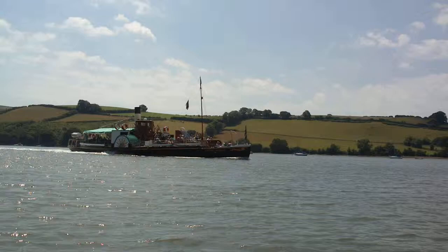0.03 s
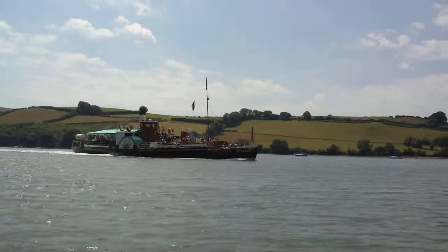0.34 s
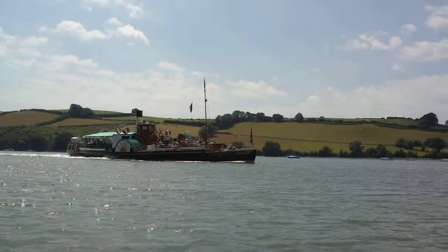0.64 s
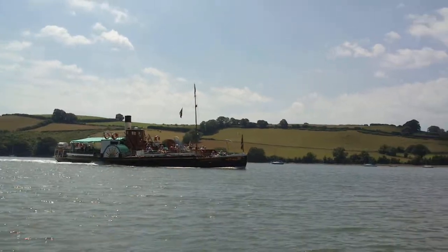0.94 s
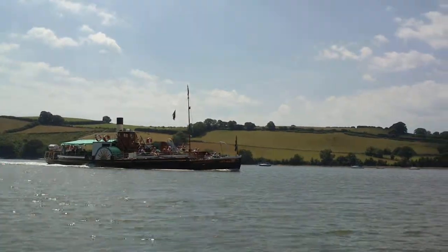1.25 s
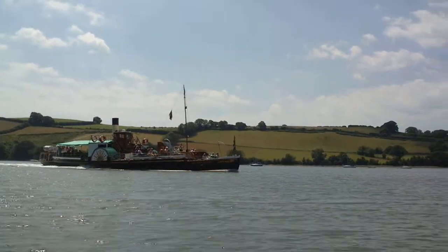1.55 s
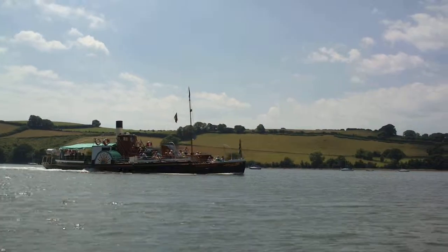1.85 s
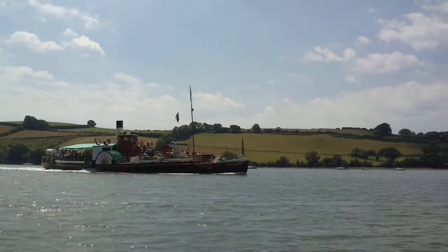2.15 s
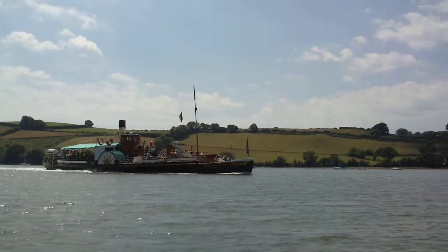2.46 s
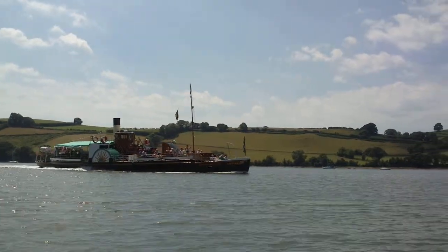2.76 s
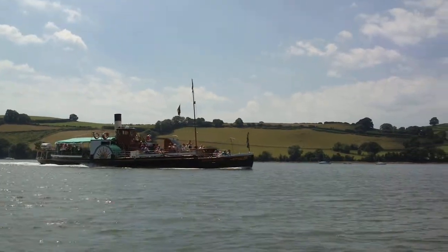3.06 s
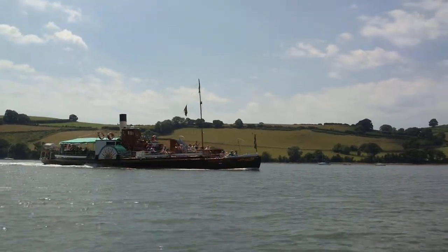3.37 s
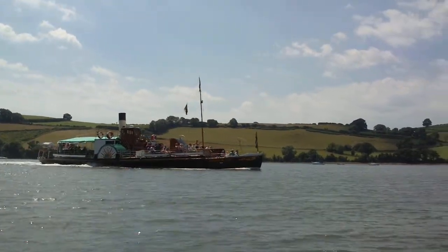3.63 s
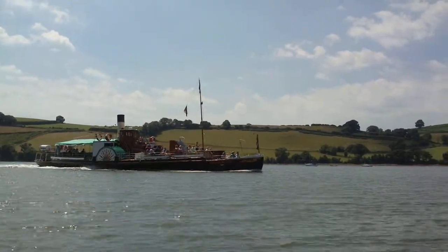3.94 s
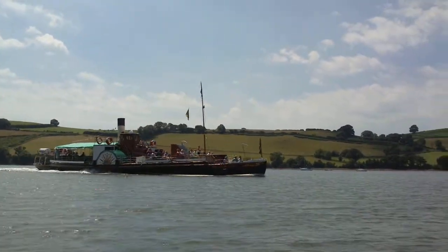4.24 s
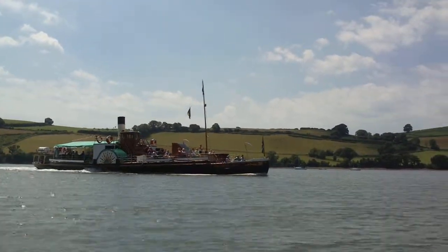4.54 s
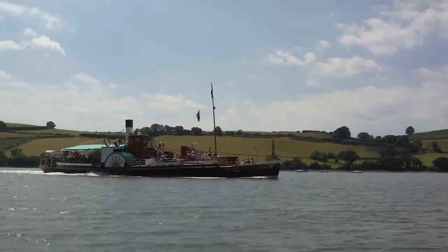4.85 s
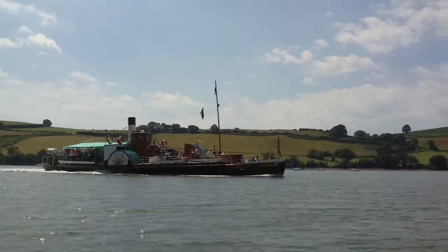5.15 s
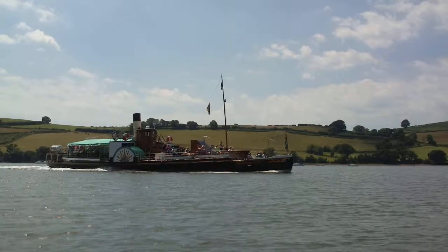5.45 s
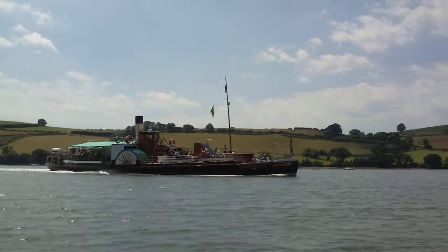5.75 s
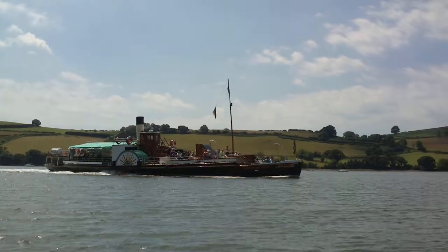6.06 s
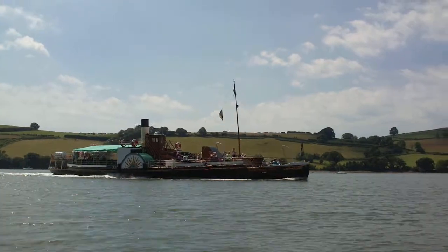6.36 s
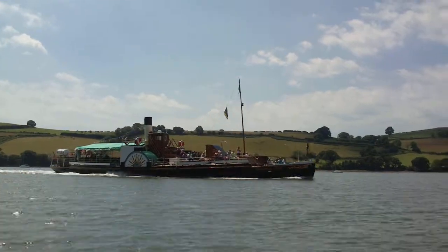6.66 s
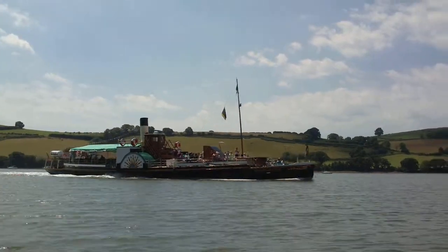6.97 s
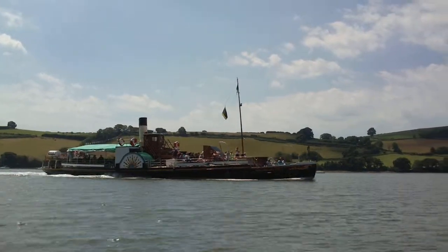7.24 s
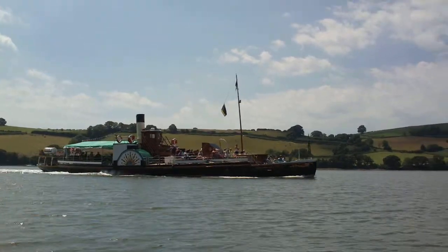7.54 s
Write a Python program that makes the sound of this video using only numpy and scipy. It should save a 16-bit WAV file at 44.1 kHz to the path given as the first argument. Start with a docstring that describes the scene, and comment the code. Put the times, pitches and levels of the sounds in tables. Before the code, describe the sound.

A distant paddle steamer slaps the water in a quick, even beat over a hissing wake, while wind rumbles on the microphone.

```python
"""A paddle steamer passes far out on a river, heard through a small camera microphone in a breeze.
At 0.4 s the sound starts: the wake churns and fizzes, wind rumbles on the microphone port.
From 0.5 s the paddle floats slap the water about seven times a second, each throwing spray.
Small ticks sound close by at 0.9, 1.8 and 4.6 s; at 3.6 s the sound cuts out for an instant.
The splashing brightens as the boat nears; waves throw extra spray, most of it around 6.4 s."""
import sys
import numpy as np
from scipy import signal
from scipy.fft import rfft, irfft
from scipy.io import wavfile
from scipy.ndimage import uniform_filter1d

SR = 44100
rng = np.random.default_rng(int(sys.argv[2]) if len(sys.argv) > 2 else 0)


def transcribe(u):
    """Save the signal u as a 16-bit wav file named by the first command-line argument.

    u: samples, shape (n,) or (channels, n), limited to [-1, 1]; the rate is SR.
    q: integer samples, one column per channel.
    """
    v = np.clip(np.atleast_2d(u).T, -1, 1)
    q = np.round(v * 32767).astype(np.int16)
    wavfile.write(sys.argv[1], SR, q)


N = 339570
TIME = np.arange(N) / SR
CUTOFF_HZ = 15500


# Bite of the floats as the hull rides the river: time_s, level_db
SLAP_LEVELS = [(.55, -54.5), (.95, -50), (1.9, -51), (3.3, -48.5), (3.8, -52.5), (4.25, -48.5),
               (5.6, -48.5), (6.95, -48.5), (7.6, -48.5)]
# Collapsing air pockets: frequency_hz, relative_db
SLAP_SPECTRUM = [(150, -4), (280, 1.5), (580, -2), (850, -6.5), (1350, -10), (2150, -10.5), (2700, -19.5),
                 (4400, -30), (8000, -41), (15000, -65)]
# Spray and foam: frequency_hz, relative_db
SPRAY_SPECTRUM = [(1500, -2.5), (3500, -12.5), (5500, 3), (7000, 5.5), (8200, -9), (11000, -19),
                  (15000, -59)]
def paddles(spray_db=-68.5, spray_rise_db_per_s=.2, wave_share=1.37,
            slap_scatter_db=1.5, spray_scatter_db=1.3, lumps_db=1.28):
    """Each float smacks collapsing air pockets into the water and flings up finer spray."""
    entry_s = float_times()
    slap_luck, spray_luck = rng.standard_normal((len(entry_s), 2)).T
    smack_db = np.interp(entry_s, *np.transpose(SLAP_LEVELS)) + slap_scatter_db * slap_luck
    shower_db = spray_db + spray_rise_db_per_s * entry_s + spray_scatter_db * spray_luck
    smack = swells(entry_s, smack_db, rise_s=0.014, fall_s=0.04, hold_s=0.023)
    shower = swells(entry_s, shower_db, rise_s=0.032, fall_s=0.033)
    pockets = coloured(drops(per_s=5000, spread_db=2.5), SLAP_SPECTRUM)
    spray = coloured(drops(per_s=9000, spread_db=-1.0), SPRAY_SPECTRUM)
    spray *= from_db(wave_share * wave_lift_db())
    lumps = from_db(lumps_db * drift(rate_hz=59))   # water breaks unevenly along the float
    return (smack * pockets + shower * spray) * lumps


def float_times(first_s=.536, period_s=.14707, floats_per_turn=12,
                labour_s=.010, most_delayed_at_s=0.69, chop_s=0.0028):
    """Floats enter evenly, but for the wheel's labouring once a turn and the river's chop."""
    even_s = np.arange(first_s, TIME[-1], period_s)
    turns = (even_s - most_delayed_at_s) / (floats_per_turn * period_s)
    return even_s + labour_s * np.cos(2 * np.pi * turns) + chop_s * rng.standard_normal(len(even_s))


# Waves at the wheel: centre_s, base_lift_db, half_length_s
WHEEL_WAVES = [(1.033, 0.5, 0.15), (4.68, 2.5, 0.17), (6.448, 5, .25), (7.313, 3, .25)]
def wave_lift_db():
    """The wheel digs into a wave and throws more water; each layer scales this lift by its share."""
    return sum(lift_db * hump(centre_s, half_s) for centre_s, lift_db, half_s in WHEEL_WAVES)


# Tumbling white water: frequency_hz, relative_db
CHURN_SPECTRUM = [(100, 5.5), (280, 2.5), (600, -0.5), (850, -4), (1350, -8), (2150, -6.5), (2700, -16),
                  (3600, -21), (6000, -26.5), (15000, -46.5)]
def wake(churn_start_db=-50.5, churn_rise_db_per_s=0.156, churn_wave_share=0.12,
         fizz_start_db=-69, fizz_rise_db_per_s=0.29, fizz_wave_share=.7):
    """White water tumbles behind the wheels and foam fizzes; both grow with nearness and waves."""
    lift_db = wave_lift_db()
    churn_db = churn_start_db + churn_rise_db_per_s * TIME + churn_wave_share * lift_db
    fizz_db = fizz_start_db + fizz_rise_db_per_s * TIME + fizz_wave_share * lift_db
    churn = from_db(churn_db) * coloured(drops(per_s=9000, spread_db=2.5), CHURN_SPECTRUM)
    fizz = from_db(fizz_db) * coloured(drops(per_s=20000, spread_db=-3.0), SPRAY_SPECTRUM)
    return churn + fizz


def approaching(x, first_db=-2.0, last_db=3.5, centre_hz=3200, width_hz=1400):
    """The splashing gains presence as the boat nears."""
    presence = signal.lfilter(*signal.iirpeak(centre_hz, centre_hz / width_hz, fs=SR), x)
    gain = from_db(np.linspace(first_db, last_db, N))
    return x + presence * (gain - 1)


def reflected(x, first_lag_s=0.00196, last_lag_s=0.00184, echo_db=-19.0, lowpass_hz=4500):
    """A nearby surface adds a faint short echo; its comb slides upward as the boat moves on."""
    lag_s = np.linspace(first_lag_s, last_lag_s, N)
    delayed = np.interp(TIME - lag_s, TIME, x)
    pole = np.exp(-2 * np.pi * lowpass_hz / SR)
    echo = signal.lfilter([1 - pole], [1, -pole], delayed)
    return x + from_db(echo_db) * echo


# Steady breeze: time_s, level_db
BREEZE_LEVELS = [(.45, -46), (1.8, -43.5), (2.4, -38), (3.15, -46), (4.45, -35.5), (4.9, -35),
                 (5.12, -39.5), (5.95, -43.5), (6.55, -37.5), (6.9, -39), (7.7, -43)]
# Gusts on top: centre_s, level_db, half_length_s
WIND_GUSTS = [(1.0, -38, 0.095), (1.125, -38, 0.035), (1.55, -35.5, 0.061), (2.106, -35, 0.038),
              (2.285, -38, 0.063), (2.709, -34.5, 0.028), (2.815, -31.5, 0.013), (2.986, -37.5, 0.056),
              (3.365, -38.5, 0.063), (3.607, -35, 0.02), (3.822, -35, 0.026), (4.96, -34.5, .04),
              (5.464, -36, 0.079), (5.696, -33, 0.027), (6.254, -37, 0.058)]
# Turbulence at the port: frequency_hz, relative_db
RUMBLE_SPECTRUM = [(10, -11.5), (22, -1.5), (38, 1), (65, -4.5), (100, -13.5), (160, -18.5), (240, -31.5),
                   (400, -47), (1500, -75)]
# Single eddies: centre_s, peak_db, pitch_hz
PORT_EDDIES = [(2.208, -34, 119), (3.4029, -28.5, 107), (3.82, -29, 45), (4.83, -34, 110), (4.959, -26, 54)]
def wind(flutter_db=2.3, evenness=0.9):
    """Breeze and gusts rumble on the microphone port; each eddy gives one swing of pressure."""
    breeze_db = np.interp(TIME, *np.transpose(BREEZE_LEVELS)) + flutter_db * drift(rate_hz=6)
    gust_power = sum(from_db(db) ** 2 * hump(centre_s, half_s) for centre_s, db, half_s in WIND_GUSTS)
    envelope = np.sqrt(from_db(breeze_db) ** 2 + gust_power)
    rumble = coloured(rng.standard_normal(N), RUMBLE_SPECTRUM)
    running_rms = np.sqrt(uniform_filter1d(rumble ** 2, size=4000))
    out = envelope * rms_one(rumble / running_rms ** evenness)   # evened, so the envelope leads
    for centre_s, peak_db, pitch_hz in PORT_EDDIES:
        phase = 2 * np.pi * pitch_hz * (TIME - centre_s)
        out += from_db(peak_db) * phase * np.exp(.5 * (1 - phase ** 2))
    return out


# Small ticks close by: peak_s, level_db, pitch_hz, width_hz, decay_s
NEAR_TICKS = [(0.877, -50, 3700, 3400, 0.0016), (1.84, -49.5, 6960, 1790, 0.0017),
              (4.615, -45, 1570, 690, 0.0012)]
def ticks():
    """Each tick is a few milliseconds of grit through a broad resonance, dulled an octave above it."""
    out = np.zeros(N)
    for peak_s, level_db, pitch_hz, width_hz, decay_s in NEAR_TICKS:
        radius = np.exp(-np.pi * width_hz / SR)
        resonance = [1, -2 * radius * np.cos(2 * np.pi * pitch_hz / SR), radius ** 2]
        grit = signal.lfilter([1, 0, -1], resonance, rng.standard_normal(N))
        lowpass = signal.butter(2, min(2 * pitch_hz, CUTOFF_HZ), fs=SR, output="sos")
        envelope = swells([peak_s], [level_db], rise_s=0.001, fall_s=decay_s)
        out += envelope * rms_one(signal.sosfilt(lowpass, grit))
    return out


def drops(per_s, spread_db):
    """Impacts of drops and bursting bubbles, random in time and size; rms 1."""
    sizes = from_db(spread_db * np.minimum(rng.exponential(1, N), 4))
    signs = rng.choice([-1, 1], N)
    hits = rng.random(N) < per_s / SR
    return rms_one(sizes * signs * hits)


def swells(times_s, levels_db, rise_s, fall_s, hold_s=0):
    """A rounded rise, a hold centred on each time, then a dying tail; powers add."""
    power = np.zeros(N)
    for centre_s, level_db in zip(times_s, levels_db):
        near = slice(max(int((centre_s - .1) * SR), 0), int((centre_s + .3) * SR))
        age_s = TIME[near] - centre_s
        beyond_hold_s = np.maximum(np.abs(age_s) - hold_s / 2, 0)
        exponent = np.where(age_s < 0, -(beyond_hold_s / rise_s) ** 2, -2 * beyond_hold_s / fall_s)
        power[near] += from_db(level_db) ** 2 * np.exp(exponent)
    return np.sqrt(power)


def coloured(x, spectrum):
    """Give a steady excitation a spectrum; rms 1."""
    hz, db = np.transpose(spectrum)
    bins_hz = np.maximum(np.fft.rfftfreq(N, 1 / SR), 1)
    gain = from_db(np.interp(np.log(bins_hz), np.log(hz), db))
    return rms_one(irfft(rfft(x) * gain, N))


def drift(rate_hz):
    """Smooth random wander up to about rate_hz; rms 1."""
    bins_hz = np.fft.rfftfreq(N, 1 / SR)
    return rms_one(irfft(rfft(rng.standard_normal(N)) / (1 + (bins_hz / rate_hz) ** 4), N))


def hump(centre_s, half_s):
    """Gaussian rise and fall of height 1."""
    return np.exp(-((TIME - centre_s) / half_s) ** 2)


def from_db(db):
    """Decibels to gain."""
    return 10 ** (np.asarray(db) / 20)


def rms_one(x):
    """Scale to unit power."""
    return x / np.sqrt(np.mean(x ** 2) + 1e-20)


def scene():
    """Steamer, wind and ticks in one channel."""
    steamer = reflected(approaching(paddles() + wake()))
    return (steamer + wind() + ticks())[None]


# Resonances and notches of the microphone port and housing: centre_hz, width_hz, gain_db
PORT_RESONANCES = [(299.4, 18.5, 4.5), (356.4, 94, -8.5), (633, 140, 3), (1160, 140, 1.5), (1586, 220, 4.5),
                   (2240, 96, 1), (2425, 120, -6.5), (2550, 87, 2.5), (6280, 1530, 10.5)]
def record(dry, hiss_db=-76.0, start_s=.416, gap_from_s=3.6125, gap_to_s=3.641):
    """The port colours, the preamplifier hisses; the sound starts late, drops out once, loses its top."""
    for centre_hz, width_hz, gain_db in PORT_RESONANCES:
        peak = from_db(gain_db / 2)
        half_width = np.pi * width_hz / SR
        tuning = -2 * np.cos(2 * np.pi * centre_hz / SR)
        numerator = [1 + half_width * peak, tuning, 1 - half_width * peak]
        denominator = [1 + half_width / peak, tuning, 1 - half_width / peak]
        dry = signal.lfilter(numerator, denominator, dry)
    hiss = from_db(hiss_db) * rng.standard_normal(N)
    live = (TIME > start_s) & ((TIME < gap_from_s) | (TIME > gap_to_s))
    lowpass = signal.ellip(12, .1, 80, CUTOFF_HZ, fs=SR, output="sos")
    return signal.sosfilt(lowpass, (dry + hiss) * live)


dry = scene()
out = record(dry)
transcribe(out)
```